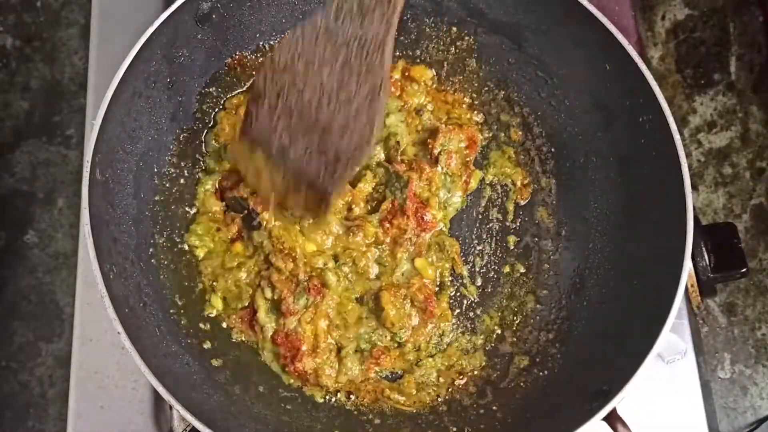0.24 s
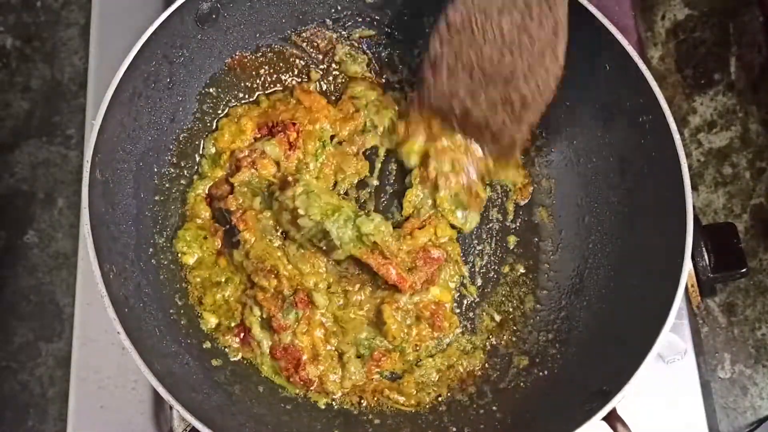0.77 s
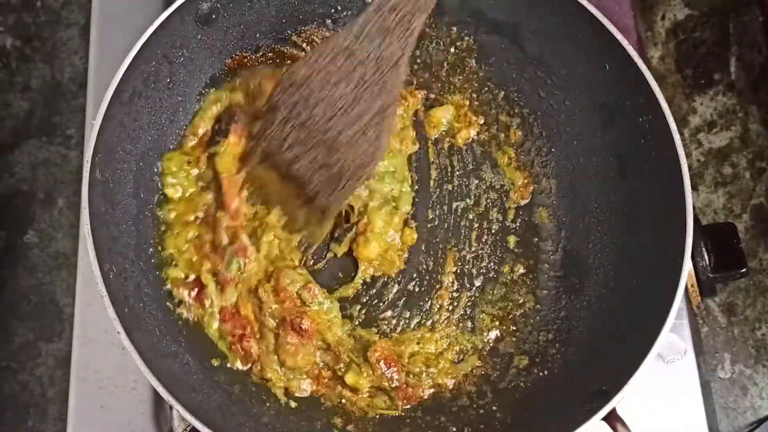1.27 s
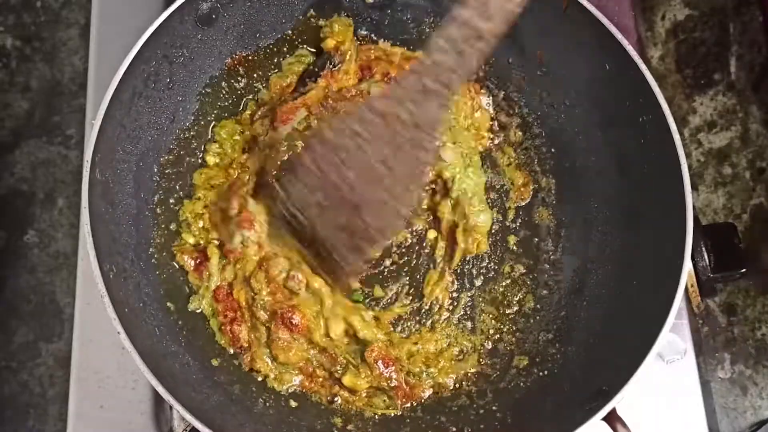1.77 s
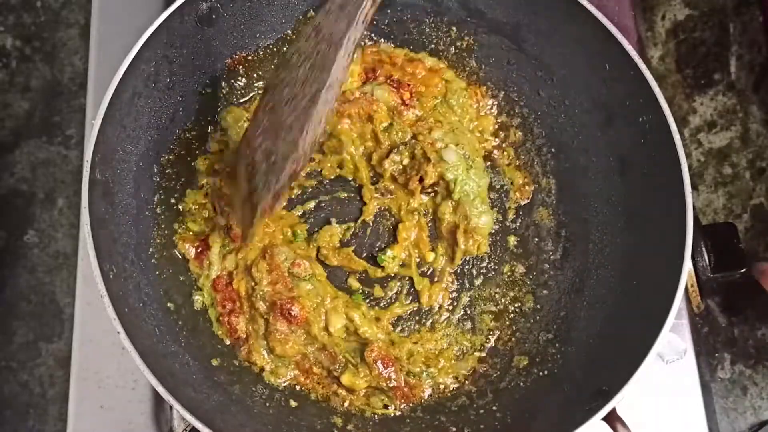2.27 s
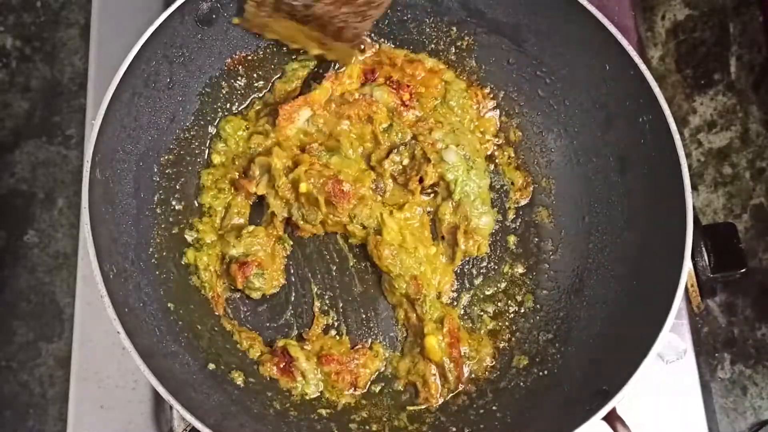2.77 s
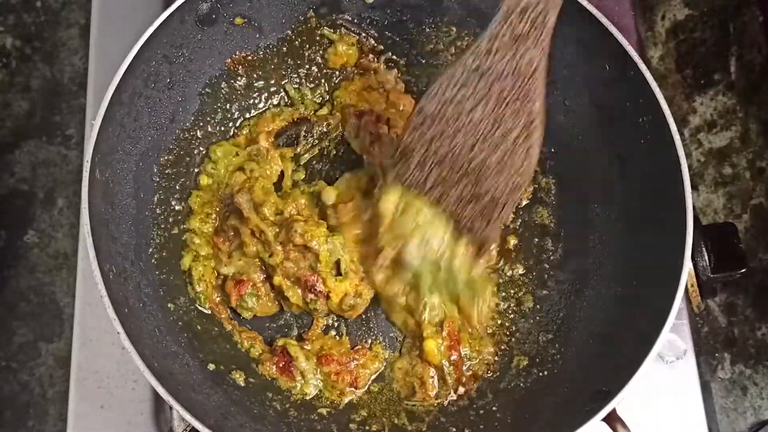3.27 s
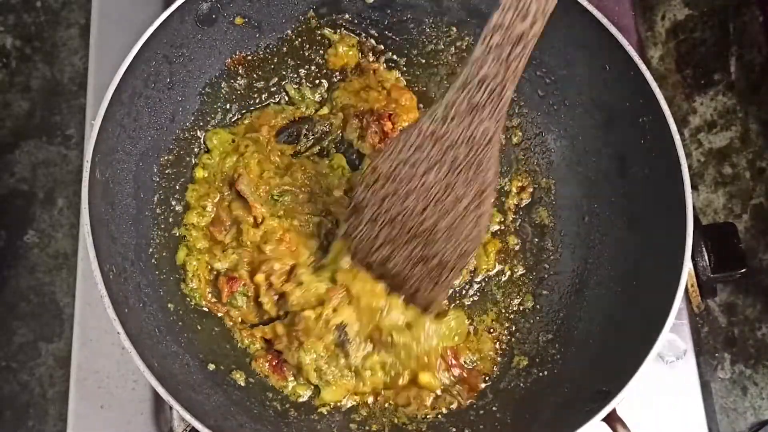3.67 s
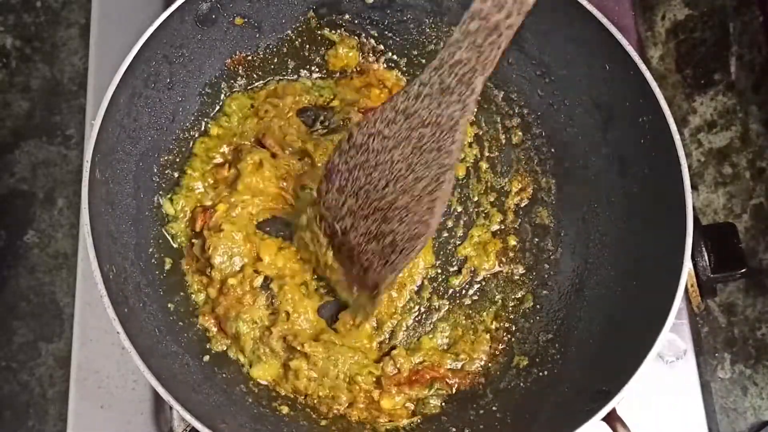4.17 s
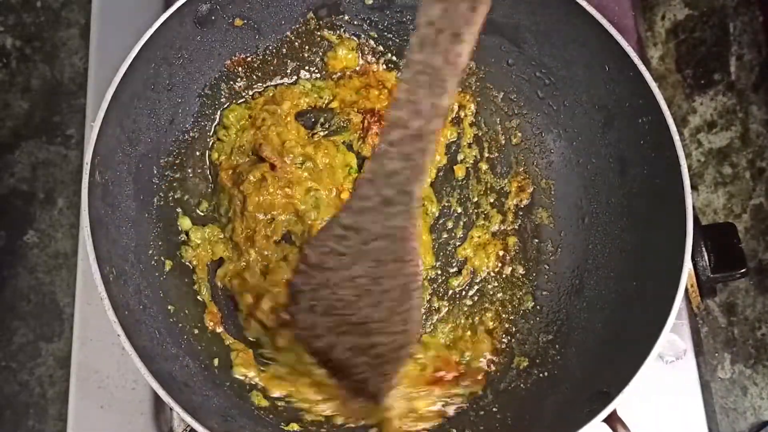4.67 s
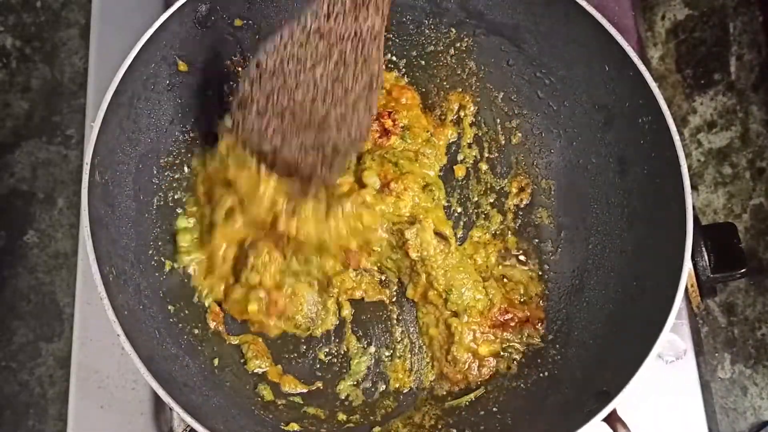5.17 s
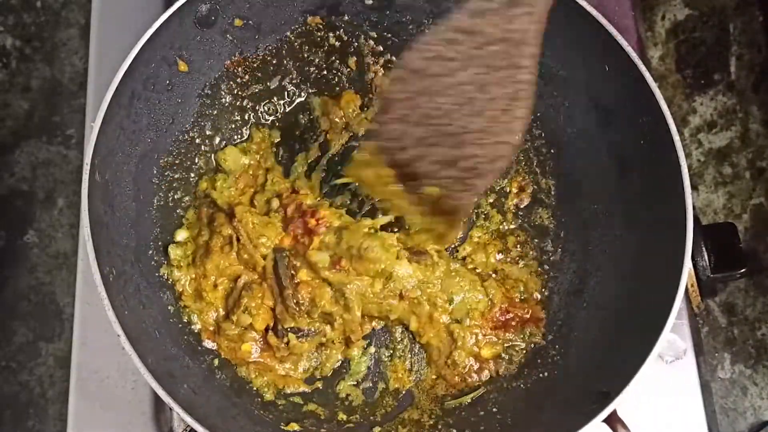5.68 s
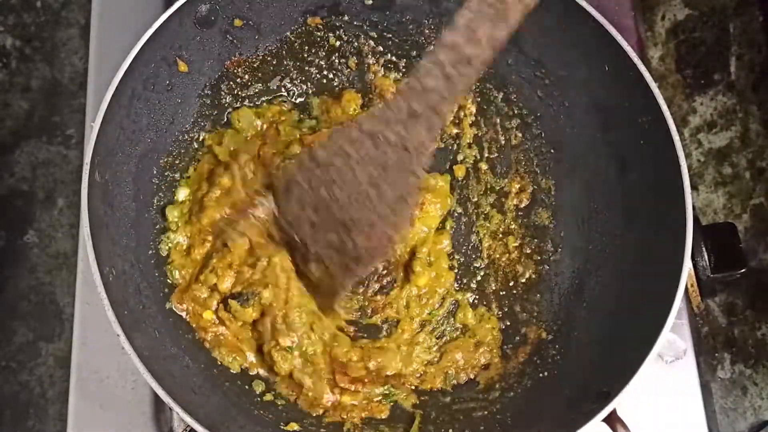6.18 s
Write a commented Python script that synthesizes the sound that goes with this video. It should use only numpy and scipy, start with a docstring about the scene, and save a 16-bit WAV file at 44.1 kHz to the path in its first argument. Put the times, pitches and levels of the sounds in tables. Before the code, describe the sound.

Oil sizzles steadily in a frying pan over a low room rumble. A wooden spatula starts with hard clattering knocks, then drags through thick paste in short raspy rubs with a slight moan. More taps and thuds follow, a few scrapes, then a busy run of bangs near five seconds and a last scrape. Wet paste crackles, oil spits. Close stereo microphones, small kitchen.

```python
"""Oil sizzles over a low room rumble; at once a wooden spatula knocks and chatters on a frying pan.
The blows are forces that set pan modes, blade modes and a bowl note ringing; the stove top booms along.
Dragged strokes through thick paste rub, rasp and moan by stick-slip; dry wood squeaks on the coating.
Bursting bubbles make the sizzle and the paste's crackle, noise bursts the oil spits, wavering sines the
faint low drones."""
import sys
import numpy as np
from scipy import signal
from scipy.fft import rfft, irfft
from scipy.io import wavfile
from scipy.ndimage import uniform_filter1d, map_coordinates

SR = 44100
rng = np.random.default_rng(int(sys.argv[2]) if len(sys.argv) > 2 else 0)


def unload_audio(sound):
    """Save the sound as a 16-bit wav file, at the path given as the first command line argument."""
    columns = np.transpose(np.atleast_2d(sound))
    # keep every value between -1 and 1, then stretch to whole-number steps
    steps = np.round(np.clip(columns, -1, 1) * 32767)
    wavfile.write(sys.argv[1], SR, steps.astype(np.int16))


N = 284004
TIME = np.arange(N) / SR
EDGE_HZ = 15730  # upper limit of the band


def gain_of(db):
    """Decibel law: level to amplitude."""
    return 10 ** (np.asarray(db) / 20)


def evened(x):
    """Power normalisation: scales to an rms of 1."""
    return x / np.sqrt(np.mean(x ** 2) + 1e-20)


def front_evened(x):
    """Onset normalisation: scales each channel to an rms of 1 over its first 30 ms."""
    front = x[:, :round(.03 * SR)]
    return x / np.sqrt(np.mean(front ** 2, axis=1, keepdims=True) + 1e-20)


def steadied(x):
    """Level control: evens out slow swells, as a hand holds its pressure, and leaves the quick grain."""
    slow_power = abs(uniform_filter1d((x ** 2).mean(0), size=1100))
    return x * np.sqrt(np.mean(x ** 2) / (slow_power + 1e-9))


def read(points, hz):
    """Interpolation of a table on a log-frequency axis."""
    f, value = np.transpose(points)
    return np.interp(np.log(hz + 1), np.log(f + 1), value)


def add(mix, s, sound):
    """Superposition: mixes a sound in at time s."""
    part = mix[:, max(round(s * SR), 0):][:, :sound.shape[-1]]
    part += sound[..., :part.shape[1]]


def coloured(x, spectrum):
    """Minimum-phase filter with the given spectrum, so that clicks keep their sharp front."""
    log_gain = np.log(gain_of(read(spectrum, abs(np.fft.fftfreq(4096, 1 / SR)))))
    response = np.exp(np.conj(signal.hilbert(log_gain)))
    taps = np.fft.ifft(response).real[:len(log_gain) // 2]
    return signal.oaconvolve(x, taps[None], axes=1)[:, :x.shape[1]]


def band(x, low_hz, high_hz, order=3):
    """Causal band-pass filtering."""
    edges = np.clip([low_hz, high_hz], 10, SR / 2 - 10)
    return signal.sosfilt(signal.butter(order, edges, "band", fs=SR, output="sos"), x)


# correlation of the two channels: (frequency [Hz], left-right likeness [0-1])
CHANNEL_LIKENESS = [(30, 0.1), (100, 0.92), (300, 0.92), (550, 0.69), (900, 0.049), (1500, 0.12),
                    (4000, 0.43), (15000, 0.042)]


def paired(x):
    """Partial coherence: two unrelated channels become alike in the bass, as two close microphones hear."""
    a, b = rfft(x)
    same = np.clip(read(CHANNEL_LIKENESS, np.fft.rfftfreq(x.shape[1], 1 / SR)), -1, 1)
    return irfft(np.array([a, same * a + np.sqrt(1 - same ** 2) * b]), x.shape[1])


def wander(per_s):
    """Band-limited random modulation: smooth motion through random points, with an rms of 1."""
    points = rng.standard_normal(N // 20)
    return evened(map_coordinates(points, [TIME * per_s], order=3, mode="wrap"))


def grains(per_s, spread_db):
    """Random impulse train: most clicks small, a few large, reaching the two sides differently."""
    happens = rng.random(N) < per_s / SR
    size = gain_of(spread_db * np.minimum(rng.exponential(1, N), 4.5)) * happens
    return size * rng.standard_normal((2, N))


def surge(s, rise_s, fade_s):
    """Exponential swell, 0-1, that peaks at time s and dies away."""
    away = np.maximum((s - TIME) / rise_s, (TIME - s) / fade_s)
    return np.exp(-np.minimum(away, 20))


def push(s, build_s, ease_s, edge_db=-12.5, roundness=1.1):
    """Pressure of one stroke, 0-1: edge_db one build-up before and one easing after its peak at time s."""
    away = np.maximum((s - TIME) / build_s, (TIME - s) / ease_s)
    return gain_of(edge_db * np.minimum(away, 8) ** roundness)  # roundness 1 = pointed, 2 = round


def with_walls(x, wet_db, t60):
    """Diffuse reverberation: the short, bright reflections of pan wall and kitchen."""
    t = TIME[:SR // 4]
    tail = rng.standard_normal((2, len(t))) * gain_of(-60 * t / t60)
    reflected = signal.fftconvolve(x, tail / np.linalg.norm(tail[0]), axes=1)[:, :x.shape[1]]
    return x + gain_of(wet_db) * reflected


def struck(modes, t, skew_hz=2400):
    """Modal decay: damped sines, the higher ones in ever more different phase on the two sides."""
    hz, db, t60 = np.transpose(modes)[:, :, None]
    skew = np.minimum(hz / skew_hz, np.pi / 4) * (-1) ** np.arange(len(hz))[:, None]
    level = gain_of(db - 60 * t / t60)
    return np.array([(level * np.sin(2 * np.pi * hz * t + side * skew)).sum(0) for side in (-1, 1)])


def resonate(x, hz, width):
    """Heterodyned one-pole resonance that follows the curve hz, width in Hz."""
    turn, r = np.exp(2j * np.pi * np.cumsum(hz) / SR), np.exp(-np.pi * width / SR)
    return 2 * (turn * signal.lfilter([1 - r], [1, -r], x / turn)).real


# spectrum of the room rumble: (frequency [Hz], relative level [dB])
RUMBLE_SPECTRUM = [(20, -41), (50, -36), (68, -25), (85, -0.5), (110, -5.5), (170, 2.5), (280, -5),
                   (380, -9.5), (750, -19), (1200, -19), (4000, -13.5), (15000, -25)]
# faint far drones that come and go: (start [s], end [s], mean frequency [Hz], level before swell [dB])
FAR_DRONES = [(0.517, 1.4, 177.7, -63), (1.126, 2.503, 243.2, -59), (2.054, 2.703, 181.9, -57),
              (3.297, 4.285, 180.9, -58), (3.91, 4.45, 282, -53), (3.708, 5.6, 83.1, -65)]


def room(rumble_db=-49.5, waver=0.0104):
    """Filtered noise with frequency-modulated tones: a low rumble with a few wavering drones in it."""
    rumble = evened(coloured(paired(rng.standard_normal((2, N))), RUMBLE_SPECTRUM))
    out = gain_of(rumble_db + wander(per_s=5.9)) * rumble
    for start, end, hz, db in FAR_DRONES:
        swell = np.sqrt(abs(np.sin(np.pi * np.clip((TIME - start) / (end - start), 0, 1))))
        tone = np.sin(2 * np.pi * np.cumsum(hz * (1 + waver * wander(per_s=13))) / SR)
        out += gain_of(db + 2 * wander(per_s=22)) * swell * evened(tone)
    return out


def bubbles(per_s, spread_db, ring_s=0.00021, hiss_db=-2, count=14):
    """Bubble resonance: many sizes each ring for an instant; the countless smallest merge into a hiss."""
    t = TIME[:SR // 200]
    pops = np.zeros((2, N))
    for hz in np.linspace(1500, 15000, count):
        ring = np.exp(-t / ring_s) * np.sin(2 * np.pi * hz * t)
        pops += signal.oaconvolve(grains(per_s / count, spread_db), ring[None], axes=1)[:, :N]
    return evened(pops) + gain_of(hiss_db) * rng.standard_normal((2, N))


# spectrum of the frying oil: (frequency [Hz], relative level [dB])
OIL_SPECTRUM = [(400, -11), (1200, -36), (2500, -12), (4000, -2.5), (5500, -2), (6500, -8), (7500, -3),
                (8400, -3), (11500, -8), (15500, -2)]
# fresh paste is turned onto hot metal and the sizzle flares: (peak time [s], flare [dB])
PASTE_TURNS = [(0.05, 8.5), (0.7, 5), (1.5, 4), (2.62, 5.5), (3.7, 2.5), (5.45, 7.5)]


def sizzle(start_db=-51.5, calming_db_per_s=0.23, flare_rise_s=0.13, flare_fade_s=0.48,
           steady_db=-56, flutter_db=2.3, rim_hz=11000):
    """Boiling noise: steam bubbles burst in the oil, louder on turns and calmer as the paste dries."""
    flare_db = sum(db * surge(s, flare_rise_s, flare_fade_s) for s, db in PASTE_TURNS)
    heat = gain_of(start_db - calming_db_per_s * TIME + flare_db + flutter_db * wander(per_s=29))
    stirred = coloured(bubbles(per_s=3800, spread_db=2.5), OIL_SPECTRUM)
    # the thin oil round the rim fries steadily, in finer and brighter bubbles
    rim = band(bubbles(per_s=5500, spread_db=0.5), rim_hz, 15200, order=3)
    return heat * evened(stirred) + gain_of(steady_db) * evened(rim)


# spectrum of the wet paste: (frequency [Hz], relative level [dB])
PASTE_SPECTRUM = [(250, -34), (500, 7), (850, 4.5), (1400, 3), (2500, -0.5), (4000, -7.5), (6000, -2),
                  (9000, -6.5), (15000, 0)]


def squelch(worked_db=-41, drying_db_per_s=2.5, resting_db=-4, rise_s=0.029, squeeze_s=0.031, clump_db=4.0):
    """Bursting air pockets: paste crackles in clumps, more under strokes and knocks, less as it dries."""
    stroke_work = sum(push(*stroke[:3]) for stroke in PASTE_STROKES)
    knock_work = sum(surge(knock[0], rise_s, squeeze_s) for knock in BLADE_KNOCKS)
    rest = 1 - np.minimum(stroke_work + knock_work, 1)
    level_db = worked_db - drying_db_per_s * TIME + resting_db * rest
    clumped = grains(per_s=2000, spread_db=3.0) * gain_of(clump_db * wander(per_s=52))
    pops = with_walls(clumped, wet_db=2.0, t60=0.21)
    return gain_of(level_db) * evened(coloured(pops, PASTE_SPECTRUM))


# modes of the pan with food in it: (frequency [Hz], mean relative level [dB], t60 [s])
PAN_MODES = [(240, -8, 0.14), (313, -13.5, 0.62), (366.1, -2.5, 0.32), (448, -9, 0.37), (557, -1.5, 0.13),
             (672, -7.5, 0.27), (745, -6.5, 0.26), (773.7, -1.5, 0.24), (879.6, 10, 0.082), (970, -5, 0.08),
             (1042, -4.5, 0.16), (1100, -14, 0.24), (1212, -4.5, 0.2), (1340, -15, 0.11), (1445, -26, 0.13),
             (1846, -9, 0.13), (2220, -33, 0.063), (2796, -22, 0.2), (4200, -25, 0.13), (4570, -29, 0.094)]
# spectrum of its dense higher modes and the kitchen: (frequency [Hz], relative level [dB])
RING_SPECTRUM = [(100, -7.5), (200, 4), (270, -2), (370, -1.5), (490, -1), (620, 2.5), (800, 7.5),
                 (1300, 0.5), (2200, -0.5), (3200, -9.5), (4500, -8), (7000, -14.5), (15000, -19.5)]
# decay of that ring: (frequency [Hz], t60 [s])
RING_DECAY = [(150, 0.73), (500, 0.41), (1000, 0.29), (2000, 0.17), (4500, 0.23), (12000, 0.021)]


def pan_response(modes_db=0, ring_db=0, spot_db=5.5):
    """Impulse response: a tap on one spot of the pan, its modes weighted by the spot, and a dense ring."""
    t = TIME[:SR // 2]
    f, when, z = signal.stft(paired(rng.standard_normal((2, len(t)))), SR, nperseg=256)
    decay = gain_of(-60 * when / read(RING_DECAY, f)[:, None])
    ring = signal.istft(z * decay, SR, nperseg=256)[1][:, :len(t)]
    modes = [(hz, db + spot_db * rng.standard_normal(), t60) for hz, db, t60 in PAN_MODES]
    dense = evened(coloured(ring, RING_SPECTRUM))
    return gain_of(modes_db) * evened(struck(modes, t)) + gain_of(ring_db) * dense


def bowl_note(t, chatter_s, bowl_hz=358.9, sag=0.054, sag_s=0.024, rise_s=0.0016, base_t60=0.12, hold=3.6):
    """Mass loading: the blade flattens the bowl's note, which rises to its own pitch as the blade lets go."""
    hz = bowl_hz * (1 - sag * np.exp(-t / sag_s))
    # it lasts longer the longer the blade chatters: hold is in s of t60 per s of chatter
    level = (1 - np.exp(-t / rise_s)) * gain_of(-60 * t / (base_t60 + hold * chatter_s))
    overtone = struck([(1370, -36, 0.11)], t)  # Hz, dB, t60 in s
    return front_evened(level * np.sin(2 * np.pi * np.cumsum(hz) / SR) + overtone)


def punch(t, cushion, bare_hz=780, cushion_octaves=1.69, peak_cycles=0.24, bare_cycles=0.56,
          low_hz=190, high_hz=3000):
    """Contact pulse: the dry first push of wood on metal; the pan radiates little of its deepest part."""
    cycles = t * bare_hz * 2 ** (-cushion_octaves * cushion)  # paste lowers the pitch
    # bare wood lets the push swing on for longer
    age = cycles / (peak_cycles + bare_cycles * (1 - cushion) ** 2)
    return band(-np.sin(2 * np.pi * cycles) * age * np.exp(1 - age), low_hz, high_hz, order=2)


def smack(t, smack_s=0.0019, low_hz=700, high_hz=8000):
    """Decaying noise burst: wet paste slaps between blade and pan at the first touch."""
    return band(rng.standard_normal((2, len(t))) * np.exp(-t / smack_s), low_hz, high_hz, order=2)


# modes of the wooden blade, damped by hand and paste: (frequency [Hz], relative level [dB], t60 [s])
BLADE_MODES = [(251, -24, 0.022), (560, 3, 0.035), (754, 14.5, 0.056), (1113, 7.5, 0.022),
               (2014, 7.5, 0.03), (2753, 13.5, 0.031), (4003, 8, 0.021), (6770, 4.5, 0.013)]
# blade meets pan: (time [s], strength [dB], cushioning by paste [0-1], decay time of the chatter [s],
# grit under the edge [dB], punch of the first push [dB])
BLADE_KNOCKS = [(0.066, -31, 0.35, 0.0025, 1.5, 14), (0.0818, -28.5, 0.35, 0.0099, 1, 3),
                (0.101, -41.5, 0.95, 0.00096, 15, 23), (0.142, -44, 0.94, .003, -6, 17),
                (0.207, -47, 0.17, 0.0046, -2, 0), (0.322, -30, 0.74, 0.011, -2, -3),
                (0.382, -39.5, 0.26, 0.0053, -4, -6), (0.418, -32, 0.53, 0.003, 3.5, 14.5),
                (0.43, -31.5, 0.45, 0.0074, -2, 6), (0.6809, -26.5, 0.83, 0.021, 3, -17),
                (0.733, -37.5, 0.35, 0.069, 6, -9), (0.8293, -33, 0, 0.0054, 3.5, -1),
                (0.841, -32.5, 0.13, 0.014, 6.5, -3), (2.343, -39, 0.8, 0.002, -22, 14),
                (2.367, -45, 1, .002, -17, 13), (2.393, -44, 0.38, 0.0068, 1, -4),
                (2.48, -43.5, 0.23, 0.028, 2, -3), (2.538, -50.5, 0.22, 0.013, 8, 6),
                (2.751, -28.5, 0.87, 0.0066, 1.5, 5), (2.77, -41.5, 0.19, 0.004, 3, -4),
                (2.845, -32, 0.57, 0.0017, 7, 1), (2.865, -38.5, 0.63, 0.0026, -13, 10),
                (2.877, -42, 0.09, 0.0091, 4.5, -13), (2.962, -42.5, 0.11, 0.0028, 3, -1),
                (3.067, -47.5, 0.07, 0.0049, 0, -4), (3.106, -35.5, 0.89, 0.055, -2, 4),
                (3.2009, -31, 0.18, 0.00062, -5, 4.5), (3.209, -34.5, 0.65, 0.013, 12.5, -13),
                (3.288, -49.5, 0, 0.008, 2, -7), (3.39, -48, 0, 0.008, -4, -7),
                (3.446, -52, 0, 0.006, -4, -2), (3.5936, -36, 0.21, 0.0053, -9, 6),
                (3.602, -46, 0, 0.0022, -11, -2), (4.034, -46.5, 0.2, 0.012, 4, 2),
                (4.095, -46, 0.18, 0.014, 5.5, -1), (4.457, -35, 0.39, 0.021, -2, 7),
                (4.533, -36.5, 0.46, 0.002, 9.5, -1), (4.585, -44, 0.33, 0.012, 6.5, -1),
                (4.644, -41, 1, 0.0041, -1, -4), (4.659, -33, 0.34, 0.0015, 4, 3),
                (5.0076, -36.5, 0.9, 0.00091, 3, 8), (5.038, -39, 0.31, 0.021, -1, 0),
                (5.0813, -26, 0.69, 0.006, -7, 11.5), (5.098, -36.5, 0.18, 0.038, 4.5, -9),
                (5.118, -31, 0.34, 0.025, 4, -6), (5.201, -43, 0.01, 0.0032, 4, 7),
                (5.302, -45, 0, 0.0042, -2.5, 5), (5.3494, -29.5, 0.79, 0.026, -2.5, -14),
                (5.4368, -28, 0.58, 0.0016, -10, 10.5), (5.457, -37.5, 0.19, 0.0076, 1, 11),
                (5.521, -44.5, 0.03, 0.0023, -.5, 0), (5.592, -48, 0, 0.004, -14, 7),
                (5.7475, -25.5, 0.01, 0.0035, 1, 13.5), (5.7568, -28.5, 0.05, 0.0025, -11, 15.5)]
# what a bare blow does to the thud and a fully cushioned one to the higher bands
BARE_THUD_DB, MUFFLED_CLACK_DB, MUFFLED_TICK_DB, MUFFLED_SNAP_DB = -7.5, -16.5, -22, -10.5
BARE_BOWL, BOWL_POWER = 0.36, 3.85  # share of the bowl's note under a bare blow, and how it grows with paste


def knocks(spots, thud_db=0.63, clack_db=0.0, tick_db=-2.0, snap_db=-11.5, blade_db=-5.5,
           slip_s=0.0019, slips_per_s=1100, smack_db=3,
           thud_hz=225, clack_hz=570, tick_hz=1230, snap_hz=3000):
    """Impact excitation: a first push and a dying chatter of slips; soft blows thud, bare wood clacks."""
    out, t = np.zeros((2, N)), TIME[:spots[0].shape[1]]
    blade = gain_of(blade_db) * evened(struck(BLADE_MODES, t, skew_hz=3380))
    edges = [thud_hz, clack_hz, tick_hz, snap_hz, EDGE_HZ]
    for s, db, cushion, chatter_s, grit_db, punch_db in BLADE_KNOCKS:
        cushion = np.clip(cushion, 0, 1)
        happens = rng.random(len(t)) < slips_per_s / SR
        slips = rng.choice([-1, 1], len(t)) * happens * np.exp(-t / chatter_s)
        force = slips / (np.linalg.norm(slips) + 1e-9) * np.sqrt(chatter_s / slip_s)
        force[0] += 1
        response = spots[rng.integers(len(spots))] + blade
        sound = signal.fftconvolve(response, force[None], axes=1)[:, :len(t)]
        thud, clack, tick, snap = (front_evened(band(sound, low, high)) for low, high in zip(edges, edges[1:]))
        # the more paste cushions the blow, the more its thud is the plain note of the bowl
        bowl_share = BARE_BOWL + (1 - BARE_BOWL) * cushion ** BOWL_POWER
        thud = front_evened(thud + bowl_share * (bowl_note(t, chatter_s) - thud))
        body = gain_of(thud_db + BARE_THUD_DB * (1 - cushion)) * thud
        body = body + gain_of(clack_db + MUFFLED_CLACK_DB * cushion) * clack
        edge = gain_of(tick_db + MUFFLED_TICK_DB * cushion) * tick
        edge = edge + gain_of(snap_db + MUFFLED_SNAP_DB * cushion) * snap
        touch = gain_of(punch_db) * punch(t, cushion) + gain_of(smack_db + grit_db / 2) * smack(t)
        add(out, s, gain_of(db) * (touch + body + gain_of(grit_db) * edge))
    return out


# sheet metal of the stove under a push: (time [s], frequency [Hz], level before the swell [dB], t60 [s])
STOVE_BOOMS = [(0.068, 247, -18.5, 0.073), (0.076, 140, -33.5, 0.34), (0.419, 135, -42, 0.36),
               (0.831, 166.3, -28.5, 0.18), (2.85, 132.3, -46, 0.86), (5.109, 135, -35, 1),
               (5.201, 133, -39, 1.2), (5.439, 129, -43, 4.5), (5.749, 131.1, -45, 2.3),
               (5.753, 199, -47.5, 1.8)]


def booms(swell_s=0.0045):
    """Damped resonance: low rings of the stove top under the pan."""
    out, t = np.zeros((2, N)), TIME[:2 * SR]
    for s, hz, db, t60 in STOVE_BOOMS:
        add(out, s, gain_of(db - 60 * t / t60) * (1 - np.exp(-t / swell_s)) * np.sin(2 * np.pi * hz * t))
    return out


# dry blade edge on the coating: (time [s], mean frequency [Hz], level before the envelope [dB],
# decay time [s], rms hoarseness [share of the pitch])
BLADE_SQUEAKS = [(0.082, 3910, -31, 0.022, 0.029), (0.082, 4730, -38, 0.025, 0.0083),
                 (5.747, 4680, -36, 0.017, 0.011), (0.836, 2796, -42, 0.047, 0.0052),
                 (0.841, 4200, -35, 0.04, 0.01), (1.13, 4240, -41, 0.035, 0.039),
                 (1.41, 4040, -36.5, 0.032, 0.054), (1.428, 3630, -39, 0.035, 0.041),
                 (1.45, 3290, -40, 0.023, 0.043)]


def squeaks(rise_s=0.0016):
    """Frictional whistling: noise shakes the pitch of short tones, some thin and some hoarse."""
    out, t = np.zeros((2, N)), TIME[:SR // 4]
    for s, hz, db, fade_s, hoarse in BLADE_SQUEAKS:
        shake = evened(uniform_filter1d(rng.standard_normal((2, len(t))), size=60))
        tone = evened(np.sin(2 * np.pi * np.cumsum(hz * (1 + hoarse * shake), axis=1) / SR))
        add(out, s, gain_of(db) * (1 - np.exp(-t / rise_s)) * np.exp(-t / fade_s) * tone)
    return out


# drops bursting in the oil: (time [s], relative peak level [dB], frequency that places the band [Hz])
OIL_SPITS = [(0.546, -36, 8160), (0.73, -37.5, 6750), (0.787, -39, 6750), (1.3007, -29.5, 5110),
             (1.5735, -30.5, 5100), (1.9959, -47, 6640), (2.7687, -35, 6900), (3.5477, -39.5, 8300),
             (5.779, -38, 4090)]


def spits(spit_db=9.0, snap_s=0.0011, spray_s=0.0092, spray_db=-9, wet_db=-9):
    """Explosive boiling: single drops of water burst in the oil, a sharp snap and then a puff of spray."""
    out, t = np.zeros((2, N)), TIME[:SR // 20]
    burst = np.exp(-t / snap_s) + gain_of(spray_db) * np.exp(-t / spray_s)
    for s, db, hz in OIL_SPITS:
        snap = band(paired(rng.standard_normal((2, len(t)))) * burst, hz * 0.33, hz * 1.18, order=2)
        add(out, s, gain_of(db + spit_db) * snap / abs(snap).max())
    return with_walls(out, wet_db, t60=0.33)


# spectrum of the broad rub: (frequency [Hz], relative level [dB])
RUB_SPECTRUM = [(120, -31), (290, -12.5), (360, -3.5), (470, -5.5), (580, -6), (700, -4), (900, 0.5),
                (1150, 1.5), (1400, -3), (1700, -10), (3000, -4.5), (6000, -53)]
# spectrum of the gritty rasp: (frequency [Hz], relative level [dB])
RASP_SPECTRUM = [(100, -31), (600, -12), (1200, 11), (1600, 5), (2300, 0), (3000, 8), (4200, 3),
                 (5300, -1.5), (7500, -8), (12000, -11), (15500, -23)]
# blade dragged through the paste: (time of the hardest push [s], build-up [s], easing [s],
# relative rub [dB], relative rasp [dB], relative moan [dB], mean pitch of the moan [Hz])
PASTE_STROKES = [(1.119, 0.065, 0.15, -39, -58, -55, 880), (1.153, 0.032, 0.052, -52, -45.5, -43, 900),
                 (1.425, 0.055, 0.044, -39, -41.5, -45, 950), (1.458, 0.021, 0.037, -45, -42.5, -55, 890),
                 (1.684, 0.005, 0.052, -37, -46.5, -47, 760), (1.721, 0.048, 0.095, -39, -41.5, -47, 896),
                 (1.975, 0.1, 0.056, -43.5, -50.5, -53, 944), (2.262, 0.024, 0.041, -49, -64, -54, 720),
                 (3.692, 0.054, 0.046, -37.5, -51, -44.5, 790), (3.9, 0.21, 0.047, -46.5, -52, -52, 815),
                 (3.932, 0.011, 0.027, -41, -49, -41.5, 870), (3.968, 0.018, 0.056, -49, -50, -43, 780),
                 (4.14, 0.12, 0.068, -47.5, -71, -71, 780), (4.77, 0.069, 0.078, -51, -51.5, -54, 925),
                 (5.998, 0.85, 0.088, -58, -55, -71, 820), (6.099, 0.056, 0.15, -39, -52, -52, 837)]


def scrapes(spots, rub_db=0.0, moan_db=0.0, rasp_db=4.5, ring_db=-8, moan_width_hz=170,
            judder_db=4.5, tilt_hz=26, catch_db=3):
    """Stick-slip friction: dense uneven grains; the blade's pressure damps most of the pan's ring."""
    _, _, _, rubs_db, rasps_db, moans_db, pitches = np.transpose(PASTE_STROKES)
    pressure = np.array([push(*stroke[:3]) for stroke in PASTE_STROKES])
    leading = pressure.argmax(axis=0)  # the stroke that presses hardest at each moment
    force = paired(grains(per_s=1000, spread_db=3.5)) * gain_of(judder_db * wander(per_s=120))
    ring = np.zeros((2, N))
    for k, spot in enumerate(spots):
        spot_force = force[:1] * (leading % len(spots) == k)
        ring += signal.oaconvolve(spot_force, spot, axes=1)[:, :N]
    slips = evened(with_walls(force, wet_db=5.0, t60=0.17)) + gain_of(ring_db) * evened(ring)
    # the edge of the blade moans in short catches, at a pitch that shifts with its angle
    hz = pitches[leading] + tilt_hz * wander(per_s=27)
    moan = resonate(resonate(slips, hz, moan_width_hz), hz, moan_width_hz)
    layers = [(rub_db + rubs_db, coloured(slips, RUB_SPECTRUM)),
              (rasp_db + rasps_db, coloured(slips, RASP_SPECTRUM)),
              (moan_db + moans_db, moan)]
    rub, rasp, moan = ((gain_of(db) @ pressure) * steadied(evened(sound)) for db, sound in layers)
    return rub + rasp + moan * evened(gain_of(catch_db * wander(per_s=95)))


def scene():
    """Superposition of frying, spatula and room; all blows and strokes share four spots of the pan."""
    spots = [pan_response() for _ in range(4)]
    background = room() + sizzle() + squelch()
    return background + knocks(spots) + booms() + squeaks() + spits() + scrapes(spots)


# overall tone colour, with a deep notch at 9-11.5 kHz: (frequency [Hz], gain [dB])
TONE_COLOUR = [(20, 0), (4700, -1), (4950, -7.5), (6050, 0), (6350, 7), (8450, 4.5), (8750, -5),
               (9400, -18), (10000, -18.5), (11250, -56), (11550, -2), (16000, -2.5)]
# balance of the channels: (frequency [Hz], left minus right [dB])
CHANNEL_BALANCE = [(100, 0.5), (350, -3), (800, 0), (2000, 0.5), (4000, 0), (7500, -2.5), (12000, -1)]


def record(dry):
    """Linear filtering: tone colour and balance, then the band limit."""
    hz = np.fft.rfftfreq(2 * N, 1 / SR)
    colour_db = read(TONE_COLOUR, hz) + np.array([[.5], [-.5]]) * read(CHANNEL_BALANCE, hz)
    heard = irfft(rfft(dry, 2 * N) * gain_of(colour_db))[:, :N]
    low_pass = signal.firwin(511, EDGE_HZ, window=("kaiser", 9), fs=SR)
    return signal.oaconvolve(heard, low_pass[None], "same")


dry = scene()
out = record(dry)
unload_audio(out)
```